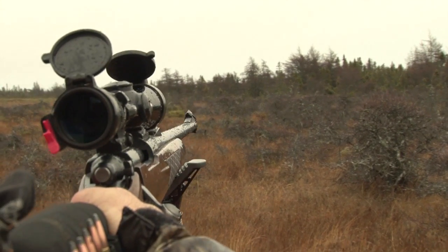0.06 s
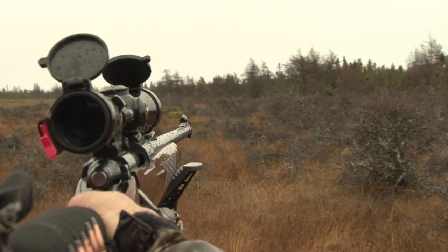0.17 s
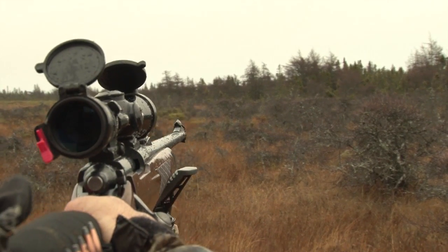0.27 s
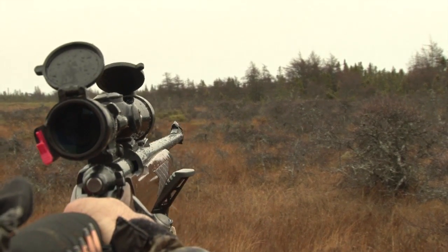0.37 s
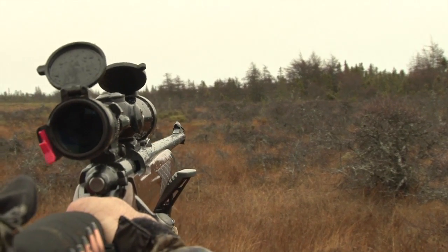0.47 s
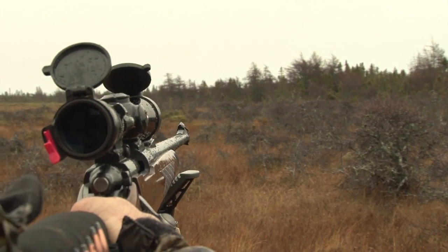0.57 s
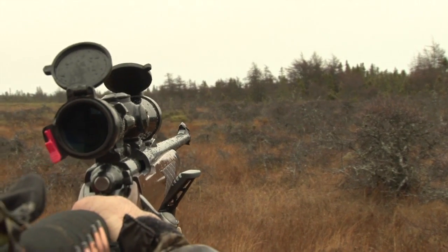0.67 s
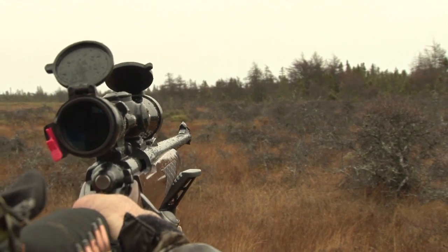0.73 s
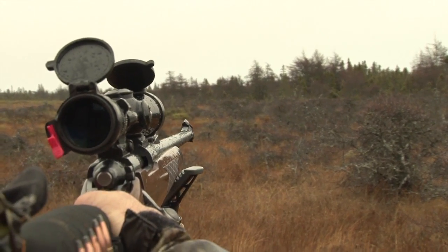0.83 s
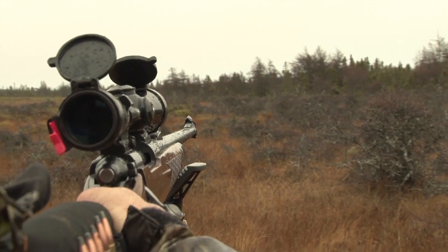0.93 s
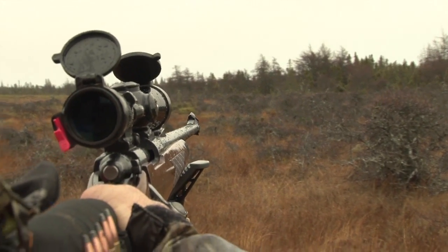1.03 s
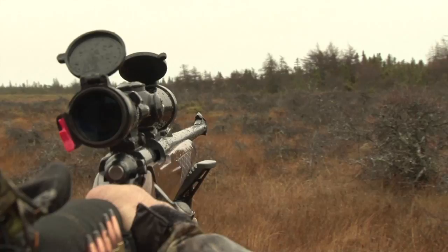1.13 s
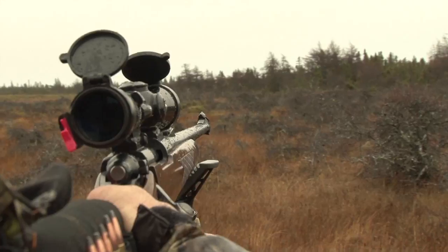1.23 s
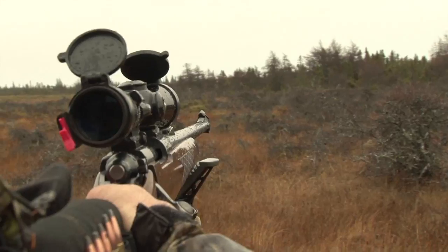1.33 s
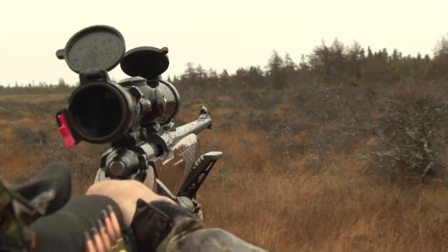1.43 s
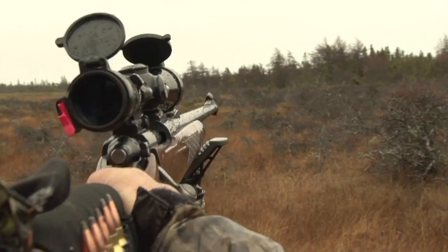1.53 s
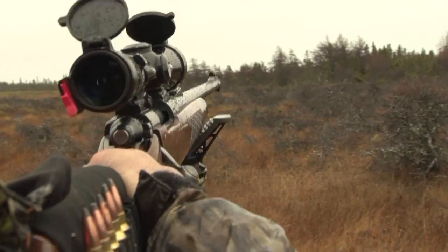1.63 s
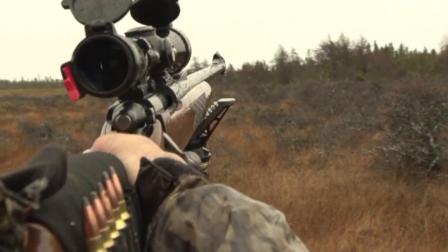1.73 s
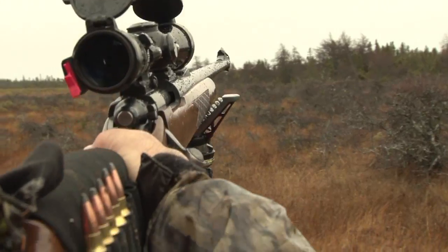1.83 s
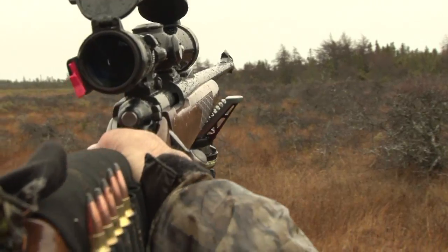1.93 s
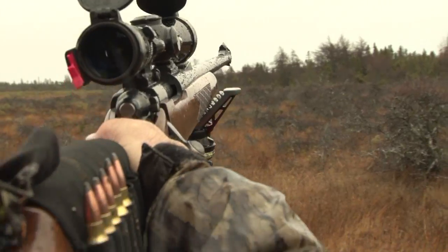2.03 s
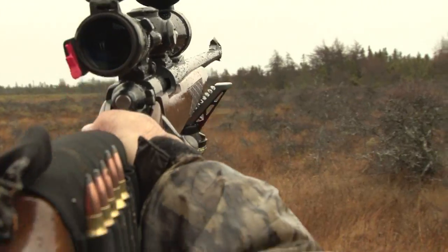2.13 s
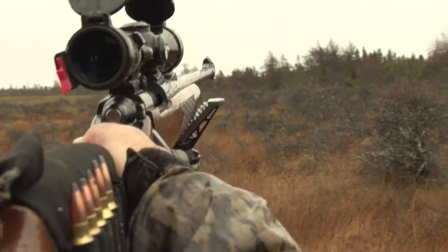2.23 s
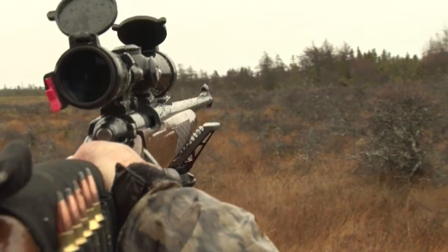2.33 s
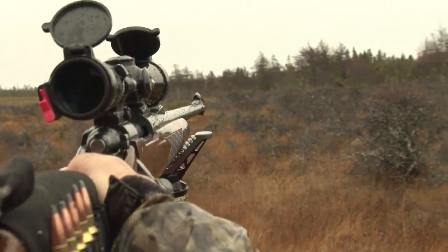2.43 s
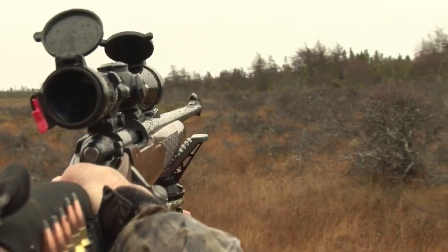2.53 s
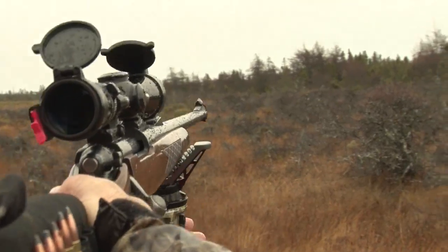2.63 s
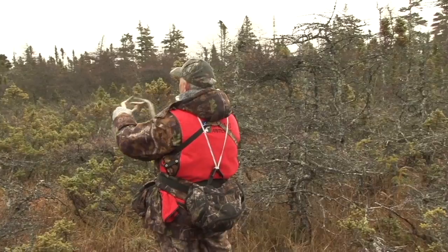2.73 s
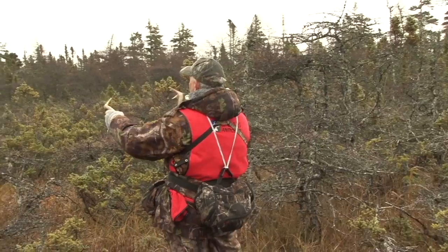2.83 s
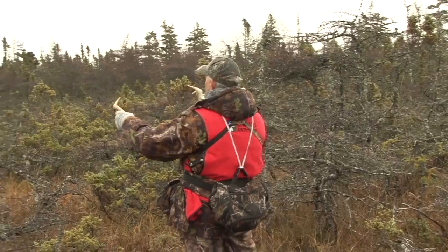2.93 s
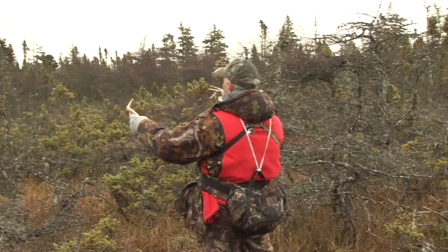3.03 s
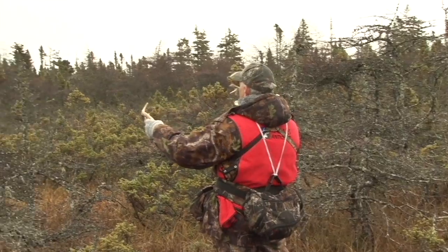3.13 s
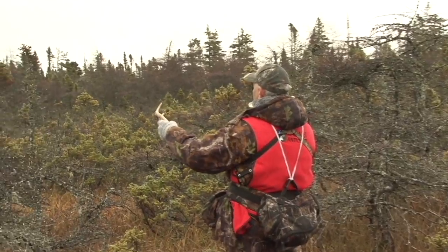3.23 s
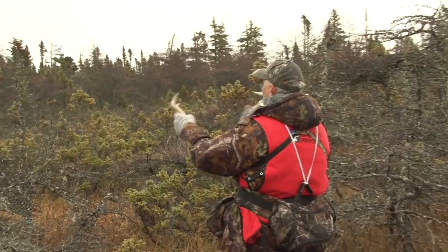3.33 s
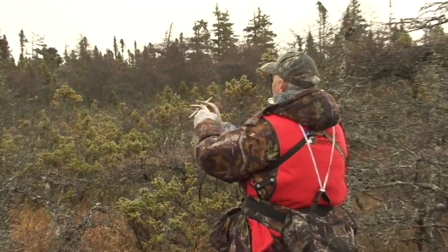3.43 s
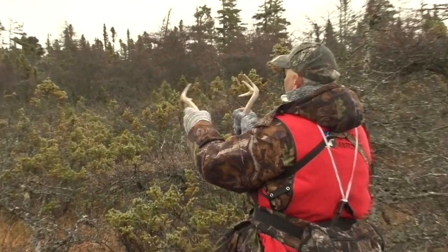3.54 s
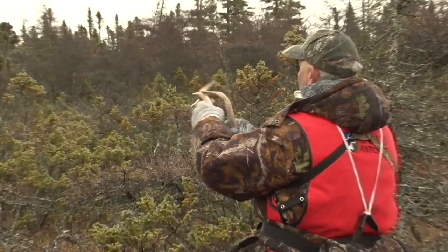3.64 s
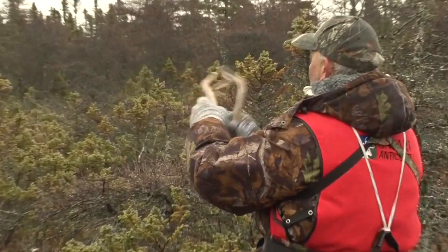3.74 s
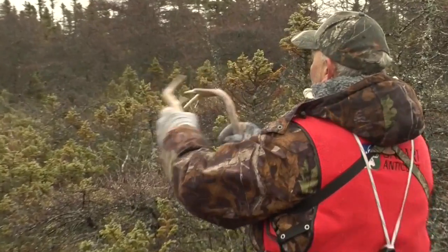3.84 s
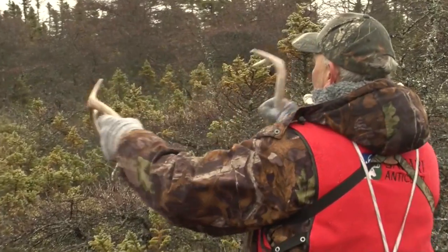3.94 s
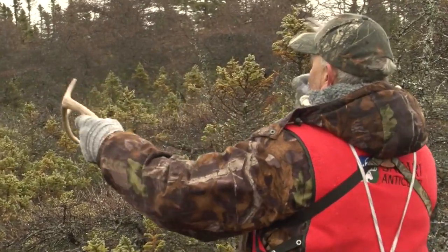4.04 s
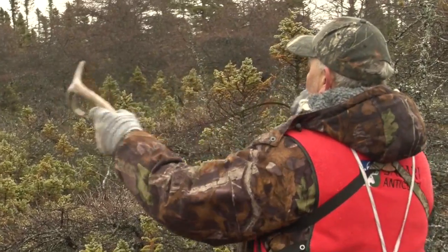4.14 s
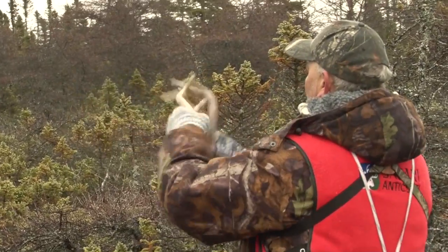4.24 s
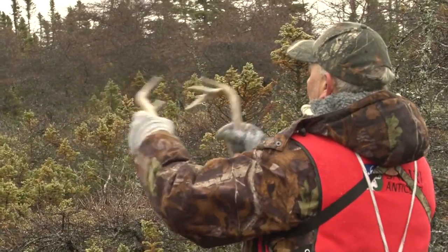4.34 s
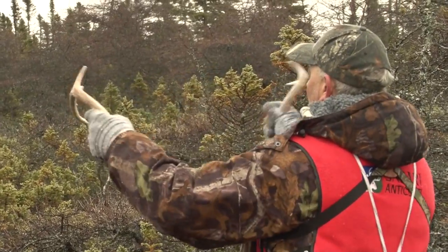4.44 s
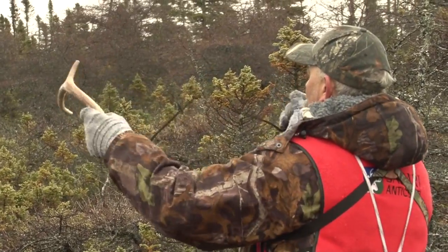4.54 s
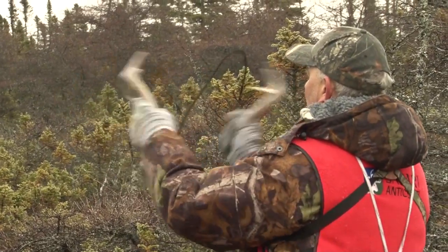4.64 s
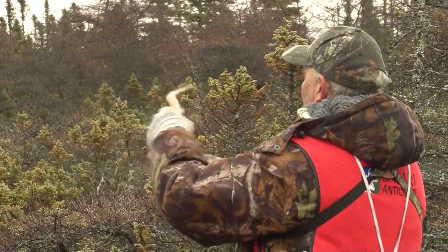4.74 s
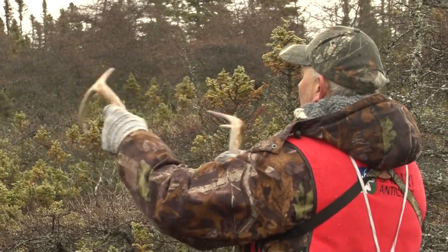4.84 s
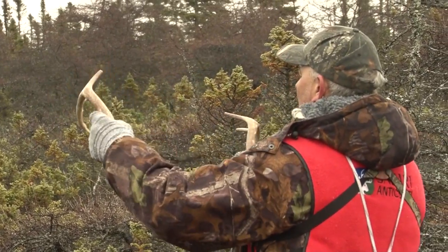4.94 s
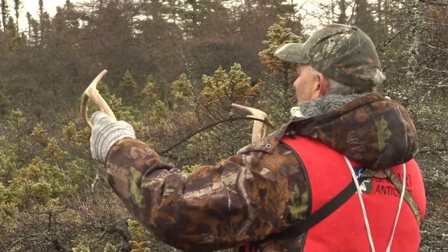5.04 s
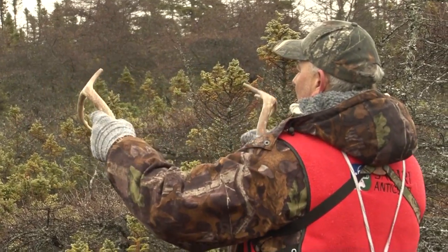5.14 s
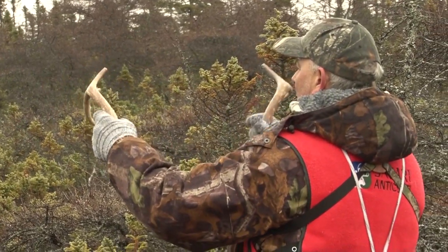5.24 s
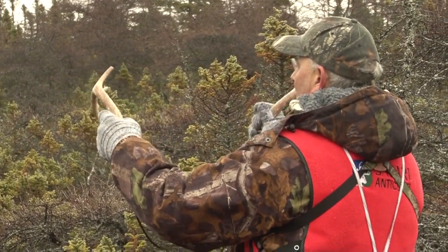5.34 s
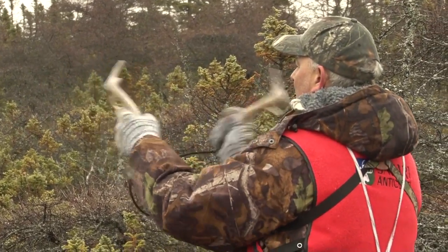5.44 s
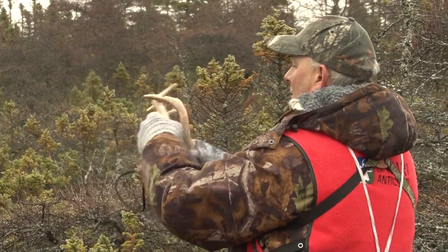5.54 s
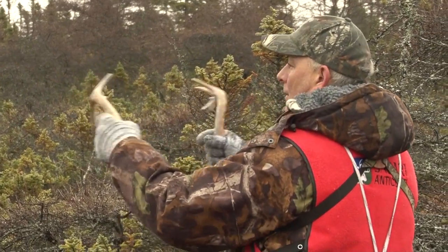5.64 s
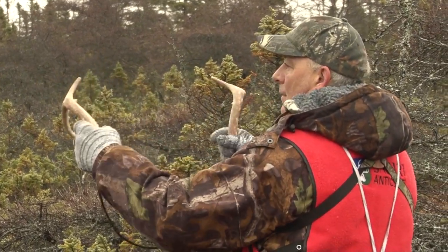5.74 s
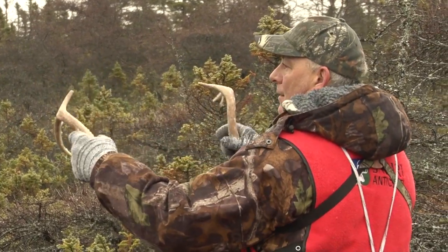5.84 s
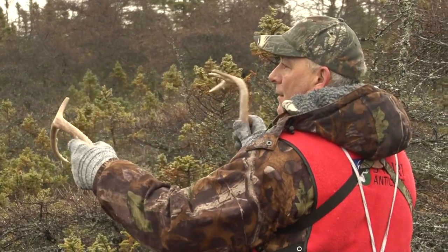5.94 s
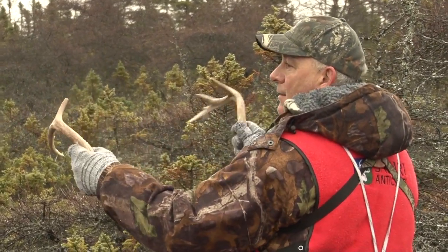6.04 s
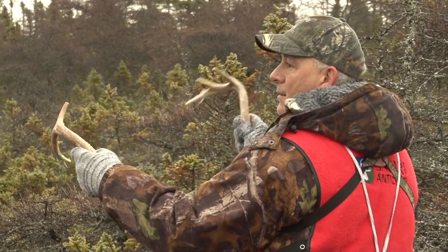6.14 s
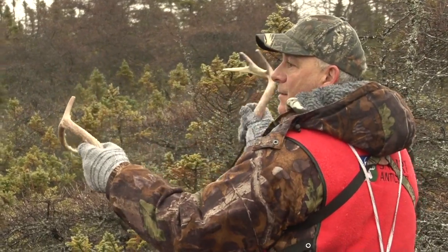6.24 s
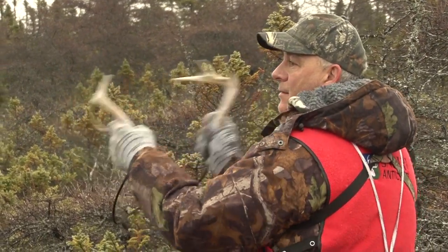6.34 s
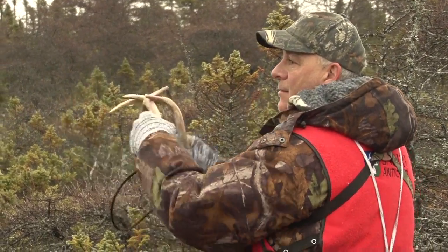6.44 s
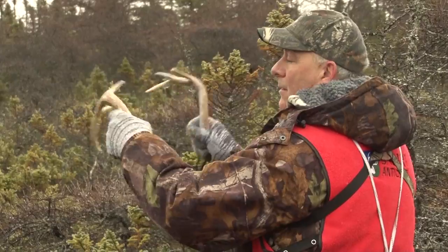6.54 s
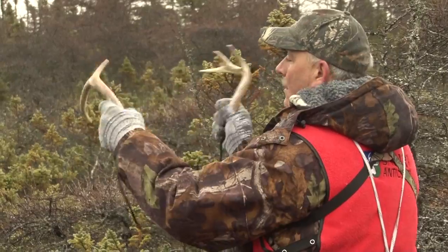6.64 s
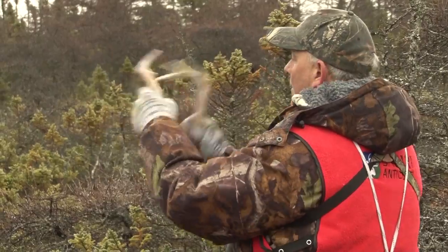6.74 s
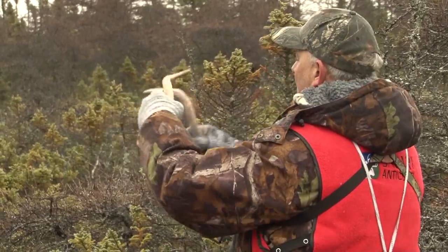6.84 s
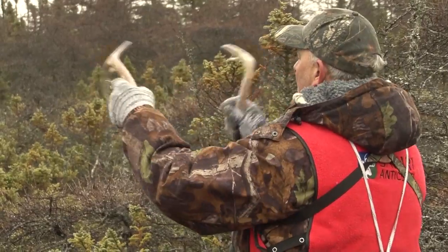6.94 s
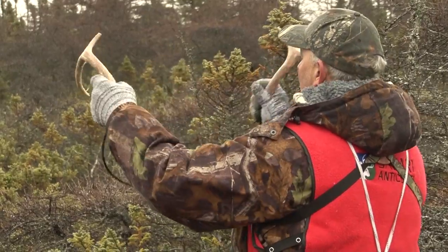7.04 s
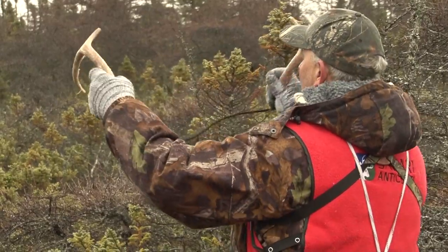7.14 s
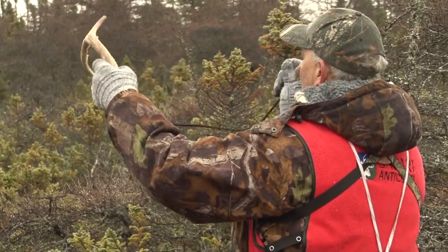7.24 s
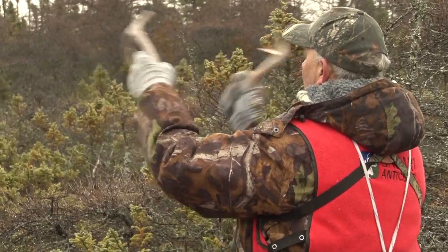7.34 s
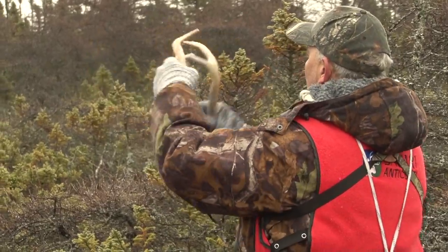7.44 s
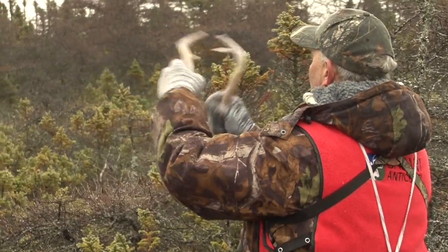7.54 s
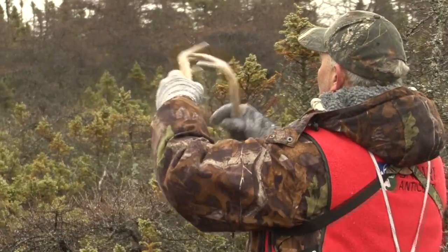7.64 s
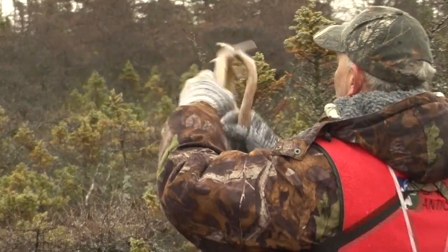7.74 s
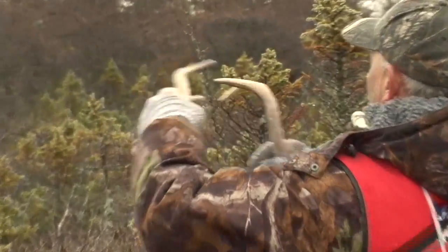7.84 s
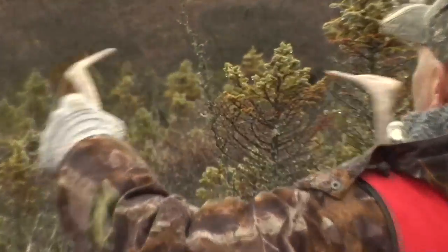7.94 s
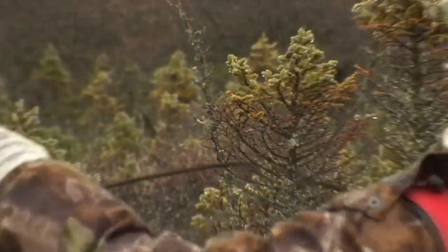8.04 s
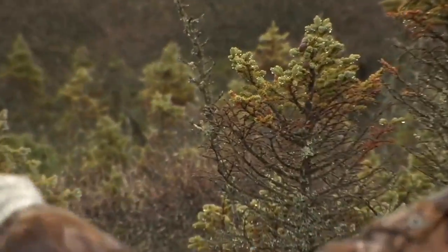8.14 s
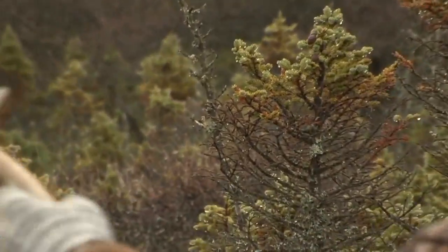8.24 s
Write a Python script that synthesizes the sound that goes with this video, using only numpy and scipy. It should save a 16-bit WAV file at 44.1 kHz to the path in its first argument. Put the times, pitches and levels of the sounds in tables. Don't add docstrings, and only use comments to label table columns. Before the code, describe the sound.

Light rain hisses and taps on a covered microphone in wet scrub, then two antlers clash in sharp, irregular bony clacks and short rattles.

```python
import sys
import numpy as np
from scipy import signal
from scipy.fft import rfft, irfft
from scipy.io import wavfile
from scipy.ndimage import uniform_filter1d

SR = 44100
rng = np.random.default_rng(int(sys.argv[2]) if len(sys.argv) > 2 else 0)


def master(y):
    cut = np.clip(np.atleast_2d(y).T, -1, 1)
    pcm = np.round(cut * 32767)
    wavfile.write(sys.argv[1], SR, pcm.astype(np.int16))


def nominal_scale(level):
    x = np.asarray(level, float) / 20
    return 10 ** x


N = 365456


def colour(x, points):
    hz, db = np.transpose(points)
    f = np.arange(2049) * SR / 4096
    gain_db = np.interp(np.log(f + 1), np.log(hz), db)
    cepstrum = irfft(np.log(nominal_scale(np.clip(gain_db, -70, 30))))
    cepstrum[1:2048] *= 2
    cepstrum[2049:] = 0
    response = irfft(np.exp(rfft(cepstrum)))
    return signal.fftconvolve(x, response)[:len(x)]


def unit(x):
    return x / np.sqrt(np.mean(x ** 2))


def walk(rate):
    hold = int(SR / rate)
    steps = np.repeat(rng.standard_normal(N // hold + 1), hold)
    return uniform_filter1d(uniform_filter1d(steps, hold), hold)[:N]


def add(track, start_s, sound):
    i = int(start_s * SR)
    track[..., i:i + sound.shape[-1]] += sound[..., :N - i]


def curve(table):
    s, db = np.transpose(table)
    return np.interp(np.arange(N) / SR, s, db)


def wash(points, db, side, flicker_db, rate):
    mid, diff = (unit(colour(rng.standard_normal(N), points)) * nominal_scale(flicker_db * walk(rate))
                 for _ in range(2))
    return nominal_scale(db) * np.array([mid + side * diff, mid - side * diff])


def band_noise(count, length, low_hz, high_hz):
    sos = signal.butter(2, [low_hz, high_hz], "band", fs=SR, output="sos")
    return signal.sosfilt(sos, rng.standard_normal((count, length)))


# frequency_hz, density_db
WIND_SPECTRUM = [(12, -34.5), (25, -3), (80, -2.5), (150, -8.5), (250, -34.5), (500, -42)]
# time_s, level_db
BUFFET_LEVELS = [(0, -77), (0.5, -75.5), (1.2, -75), (1.27, -68), (1.45, -71.5), (1.85, -74.5), (2.84, -76),
                 (3.51, -66), (3.92, -73.5), (6.55, -66.5), (7.45, -70.5), (7.68, -66.5), (7.95, -72),
                 (8.29, -64)]


def wind():
    return wash(WIND_SPECTRUM, 4 + curve(BUFFET_LEVELS), side=1.6, flicker_db=2.2, rate=5)


# frequency_hz, density_db
FLUTTER_SPECTRUM = [(100, -22.5), (190, -3.5), (270, 1.5), (330, -3.5), (400, -14.5), (900, -47.5)]
# time_s, level_db
GUST_LEVELS = [(0.0, -65.5), (0.46, -66), (0.81, -66.5), (2.12, -68.5), (2.42, -69.5), (3.32, -61.5),
               (3.9, -68.5), (4.2, -62), (5.08, -65), (5.52, -62.5), (5.7, -56.5), (6.26, -64.5),
               (6.51, -53), (7.04, -61), (7.57, -62), (8.05, -62.5), (8.29, -61.5)]


def flutter():
    calm_db, flutter_db, db_per_gust_db = -64, -68.5, 1.1
    level_db = flutter_db + db_per_gust_db * (curve(GUST_LEVELS) - calm_db)
    return wash(FLUTTER_SPECTRUM, level_db, side=0.38, flicker_db=2.0, rate=11)


# time_s, level_db
RAIN_LEVELS = [
    (0, -62.5),
    (.5, -69),
    (1.25, -65),
    (1.85, -68),
    (3.2, -67),
    (4.2, -64.5),
    (5.3, -71.5),
    (6.3, -71),
    (7.3, -69),
    (8.29, -66.5),
]


def rain_strength():
    return curve(RAIN_LEVELS)


# frequency_hz, density_db
HISS_SPECTRUM = [(2500, -19), (4500, -10), (8000, 0.5), (10200, 5.5), (14800, 0), (15300, -13),
                 (17000, -35)]


def hiss(rain_db):
    t, change_s, open_db, sheltered_db = np.arange(N) / SR, 1.91, -65.5, -74
    level_db = 0.27 * (rain_db + 69) + np.interp(t - change_s, [-.03, .03], [open_db, sheltered_db])
    swell_s, swell_width_s, swell_db = 1.14, 0.22, 4
    level_db = level_db + swell_db * np.exp(-((t - swell_s) / swell_width_s) ** 2)
    noise = wash(HISS_SPECTRUM, level_db, side=.3, flicker_db=1.5, rate=15)
    open_noise = [colour(ear, [(10300, 0.5), (12000, -3)]) for ear in noise]
    return np.where(t < change_s, open_noise, noise)


# frequency_hz, density_db
FAR_SPECTRUM = [(200, -38), (350, 1.5), (660, 2), (1400, -2.5), (2100, -7.5), (4300, -18.5), (7000, -21.5),
                (12000, -46.5)]


def far_patter(rain_db):
    return wash(FAR_SPECTRUM, rain_db, side=.6, flicker_db=3, rate=30)


def tap(t, hz, cycles, sag, rise_s):
    turns = hz * (t - sag * (t - 0.0026 * (1 - np.exp(-t / 0.0018))))
    return np.sin(2 * np.pi * turns) * np.exp(-turns / cycles) * (1 - np.exp(-(t / rise_s) ** 2))


def patter(count=1300):
    out, t, lean = np.zeros((2, N)), np.arange(256) / SR, np.array([[1], [-1]])
    for when, pitch, size, pan in rng.random((count, 4)):
        drop = tap(t, 700 * 7 ** pitch, cycles=1.1, sag=.3, rise_s=.0001)
        level_db = -60.5 - 4 * np.log(size + .03) + 8 * (pan - .5) * lean
        add(out, when * N / SR, drop * nominal_scale(level_db))
    return out


# start_s, level_db, pitch_hz, thump_over_level_db, tick_over_level_db
LEFT_DROPS = [(0.0679, -31, 2220, -12, -4.5), (0.1, -40.5, 1600, 5, -12), (0.2718, -34.5, 4260, -12, -4.5),
              (0.6058, -27.5, 2660, -15.5, -33), (0.7621, -24, 2020, -15.5, -10.5),
              (1.0537, -32.5, 2580, -15, -18), (1.3745, -37, 760, 15, -24), (1.4157, -26, 2540, -16, -30),
              (1.5053, -28, 2500, -2.5, -38), (1.953, -28.5, 2130, -4.5, -22.5),
              (2.2939, -36.5, 2050, -20, -8), (2.5398, -29, 1820, -8, -7.5),
              (2.8282, -28.5, 1800, -6.5, -9), (2.8933, -27, 2030, 1.5, -7), (3.9192, -30, 1640, -4.5, -10),
              (4.5075, -32, 2580, 1, -11.5), (4.5578, -16, 1840, -5, -12.5), (4.8638, -31.5, 1620, -12, 0),
              (5.463, -20.5, 2070, -6, -17), (5.9721, -33, 2620, -12.5, -28),
              (6.1685, -34.5, 2600, 3.5, -5.5), (6.4203, -31.5, 2750, -6, -22),
              (6.5454, -30, 2570, -19, -14), (7.602, -27.5, 1780, -15, -17)]
# start_s, level_db, pitch_hz, thump_over_level_db, tick_over_level_db
RIGHT_DROPS = [(0.8574, -33.5, 1590, -4, -35), (0.8745, -32, 1670, -3.5, -12.5),
               (1.129, -37.5, 2000, -20, -11.5), (1.786, -38.5, 2040, -7.5, -5.5),
               (2.0401, -38, 1770, 0, -11), (2.4865, -34.5, 2350, -18, -18),
               (2.6497, -35.5, 1530, -2.5, -16), (2.7046, -33.5, 2000, -0.5, -11),
               (2.9577, -33, 2130, 1, -10), (3.1504, -36.5, 2620, 0.5, -10), (3.1773, -42, 1230, 9, -13),
               (3.2987, -33.5, 2040, -10.5, -19), (4.1202, -36, 1580, 5.5, -7.5),
               (4.132, -39.5, 1700, -2.5, -5), (4.6217, -38.5, 2320, -1, -8.5),
               (5.0138, -36, 1960, -12, -7.5), (5.2664, -34, 1560, -9.5, -30),
               (5.8724, -37.5, 1606, -0.5, -3.5), (6.2135, -37, 1590, -14.5, -13),
               (6.2336, -38.5, 1600, -5.5, -12), (6.3326, -31.5, 1710, -0.5, -12),
               (7.0872, -34.5, 2530, -5, -12.5), (7.2853, -32, 2610, -0.5, -15.5),
               (7.8322, -20, 2320, -2, -7.5)]
# start_s, level_db, pitch_hz, tick_over_level_db
EARLY_DRIPS = [(0.147, -41.5, 1400, -4), (0.2319, -46, 1640, -4), (0.2607, -52, 2590, -13),
               (0.292, -42.5, 1290, -13), (0.3136, -48, 1510, -25), (0.388, -39.5, 1550, -28),
               (0.4173, -36, 1610, -15), (0.451, -40.5, 1670, -31), (0.4581, -39.5, 2220, -9),
               (0.496, -50, 1620, -18), (0.5342, -38.5, 1490, -16), (0.565, -40, 1500, -29),
               (0.618, -31, 1490, -32), (0.6987, -49, 890, -14), (0.7264, -52.5, 1130, -11),
               (0.78, -39, 1400, -13), (0.7957, -36, 2320, -20), (0.8367, -41, 1290, -15.5),
               (0.8871, -44, 1270, -32), (0.91, -41, 2390, -0.5), (0.9143, -42.5, 2280, -13),
               (0.926, -38.5, 1820, -20), (0.943, -44, 1590, -24), (1.0303, -35, 1400, -11),
               (1.0473, -35, 1720, -18), (1.0644, -40.5, 1280, -5), (1.126, -40, 2200, -19),
               (1.147, -42, 660, -16), (1.177, -41, 660, -16), (1.301, -47, 1390, -25),
               (1.3228, -50.5, 2490, -16), (1.3405, -44.5, 2210, -10), (1.446, -39.5, 570, -8),
               (1.4969, -43, 1500, -13), (1.5096, -31.5, 1200, -10), (1.5985, -40, 2240, -15.5),
               (1.6356, -36, 1580, -18), (1.7631, -47, 2380, -25), (1.8228, -48.5, 1850, -14),
               (1.8439, -40, 1610, -12), (1.858, -34, 2240, -23), (1.9257, -34, 1300, -34),
               (2.0542, -32.5, 1500, -14)]
# start_s, level_db, pitch_hz, tick_over_level_db
MIDDLE_DRIPS = [(2.098, -34.5, 2660, -6.5), (2.2211, -35, 1470, -22), (2.418, -53, 1290, -4),
                (2.5638, -43, 1100, -21), (2.621, -47.5, 1400, -10), (2.6754, -47, 1870, -11),
                (2.68, -46, 1260, -14), (2.862, -39, 1210, -22), (3.045, -36.5, 2350, -23),
                (3.0562, -42.5, 1550, -20), (3.08, -45.5, 1620, -7), (3.2006, -42, 1760, -18),
                (3.2483, -48, 1440, -15), (3.2783, -43, 1430, -19), (3.2926, -36, 1470, -21.5),
                (3.3414, -41.5, 1310, -11), (3.3716, -38.5, 1510, -22), (3.662, -43, 2210, -15),
                (3.6814, -35.5, 1400, -22), (3.7846, -32, 1970, -27), (3.788, -33.5, 1490, -13),
                (3.824, -40, 1650, -9), (4.161, -37, 2430, -20), (4.216, -45.5, 2020, -24),
                (4.5894, -37, 1300, -15), (4.5933, -41.5, 900, -35), (4.633, -36, 2510, -8),
                (4.6805, -41, 1760, -11), (4.685, -41, 940, -27), (4.7443, -42, 1660, -33),
                (4.949, -31.5, 1490, -21), (5.006, -36, 1390, -15), (5.0703, -37, 2020, -18.5),
                (5.0963, -43.5, 1380, -28.5), (5.167, -49.5, 840, -22), (5.22, -45.5, 2100, -6.5),
                (5.2354, -38, 1450, -22), (5.263, -45, 940, -22), (5.321, -52.5, 2170, -10),
                (5.406, -45, 2190, -5), (5.429, -42.5, 1320, -30), (5.4948, -47, 1490, -21),
                (5.5168, -44, 1900, -27), (5.56, -35, 1420, -14)]
# start_s, level_db, pitch_hz, tick_over_level_db
LATE_DRIPS = [(5.677, -38, 600, -22), (5.7345, -38.5, 1360, -19), (5.7895, -39, 1580, -6.5),
              (5.924, -43.5, 1720, -21), (5.9806, -41, 1850, -7), (6.0265, -43, 1510, -8),
              (6.0934, -43, 2100, -21), (6.1278, -50.5, 1640, -16), (6.16, -44, 1660, -7),
              (6.195, -46, 2420, -11), (6.206, -37.5, 2110, -14), (6.2441, -45, 2120, -20),
              (6.251, -36, 1740, -23), (6.3422, -33, 1840, -18), (6.4054, -44, 1410, -11),
              (6.7551, -44.5, 1480, -12), (6.7706, -44.5, 1110, -30), (6.8006, -43, 920, -19),
              (6.807, -44, 2000, -22), (7.018, -45.5, 890, -16), (7.025, -42, 2150, -11),
              (7.1145, -45, 1740, -21), (7.1192, -49, 2190, -18), (7.1456, -43, 1820, -17),
              (7.1491, -38.5, 1630, -8), (7.196, -48, 1335, -22.5), (7.324, -43.5, 2380, -16),
              (7.369, -41, 2520, -13), (7.395, -48, 1680, -9), (7.4535, -38, 2060, -23),
              (7.547, -33, 1310, -16), (7.6283, -43, 2080, -4), (7.995, -40, 750, -16.5),
              (8.035, -43.5, 1530, -15), (8.0846, -41.5, 1490, -14), (8.093, -43, 1710, -29),
              (8.132, -44, 1640, -14), (8.2092, -42.5, 1200, -22), (8.242, -40, 1460, -19),
              (8.254, -44, 1820, -16)]


def drops():
    rows, drip_db, drip_thump_db, pan_scatter_db = [], -2.5, -9, 4.5
    for table, pan_db in ((LEFT_DROPS, 5), (RIGHT_DROPS, -8.5)):
        for row, r in zip(table, rng.random(len(table)) - .5):
            rows.append((*row, pan_db + pan_scatter_db * r))
    for table in (EARLY_DRIPS, MIDDLE_DRIPS, LATE_DRIPS):
        for (s, db, hz, tick_db), r in zip(table, rng.random(len(table)) - .5):
            rows.append((s, db + drip_db, 1.116 * hz, drip_thump_db, tick_db, 12 * r))
    return rows


def rain_near():
    out, t, lean = np.zeros((2, N)), np.arange(1024) / SR, np.array([[1], [-1]])
    dull_hz = 930
    rows = drops()
    luck = rng.random((len(rows), 3))
    grit = band_noise(len(rows), len(t), 3500, 12000)
    for (s, db, hz, thump_db, tick_db, pan_db), noise, r in zip(rows, grit, luck):
        tick = nominal_scale(tick_db + 8.5) * noise * np.exp(-t / 0.00044)
        drop = tap(t, hz, cycles=1.66, sag=0.55, rise_s=0.3 / hz) + tick
        if hz < dull_hz:
            drop = 0.78 * np.sin(2 * np.pi * hz * t) * np.exp(-t / 0.0038) * (1 - np.exp(-(t / 0.0017) ** 2))
        cavity = np.sin(2 * np.pi * (3800 + 500 * r[1]) * t) * np.exp(-t / 0.0006)
        drop = drop + nominal_scale(-13 - 10 * r[2]) * cavity
        drop = drop + (.15 + .3 * r[0]) * np.roll(drop, int(SR * (.0006 + .0004 * r[1])))
        thump = tap(t, 800 + 300 * r[2], cycles=0.9, sag=0.809, rise_s=0.00041)
        thump = (hz > dull_hz) * nominal_scale(thump_db + 3) * thump
        cover = nominal_scale(thump_db - 13) * tap(t, 409, cycles=1.8, sag=0.27, rise_s=0.0019)
        both = (drop + thump) * nominal_scale(lean * pan_db / 2) + cover * (.25 - 0.78 * lean)
        add(out, s, nominal_scale(db + 3.5) * both)
    return out


def sleeve():
    start_s, length_s, from_hz, to_hz, level_db = 8.135, 0.048, 3900, 3100, -62
    out, u = np.zeros(N), np.arange(int(length_s * SR)) / (length_s * SR)
    wobble = uniform_filter1d(rng.standard_normal(len(u)), size=60) * 8
    turns = np.cumsum(from_hz + (to_hz - from_hz) * u) / SR
    tone = np.sin(2 * np.pi * turns) + 0.43 * np.sin(2 * np.pi * 4500 * u * length_s)
    add(out, start_s, nominal_scale(level_db) * np.sin(np.pi * u) * wobble * tone)
    return out


# start_s, body_db, then beam_over_body_db, tines_over_body_db, crack_over_body_db
BLOWS = [(2.1437, -11, -14, -13, -11), (2.148, -22, -2.5, 3.5, 2), (2.1766, -25, -13, -27.5, -13.5),
         (2.7414, -11, -11.5, -5, -6), (2.747, -17, -8, -22, -27), (2.7664, -22.5, -41, -8, -8.5),
         (3.493, -13.5, -4.5, -9, -11), (3.4955, -12, -8.5, 2, -14.5), (3.6906, -18, -13.5, -2.5, -10),
         (3.719, -20, -12, -6.5, -16), (3.8601, -16, -14, 3.5, -9.5), (4.3341, -10.5, -13, 2.5, -5),
         (4.7769, -12.5, -7.5, -5, -6), (5.5909, -10.5, -11, -4.5, -10.5), (6.4773, -21, -18, 1, -8),
         (6.4799, -18, -2.5, 2.5, -7.5), (6.4981, -20, -15, -2.5, -9.5), (6.8585, -24, 2.5, -15, -6),
         (6.8607, -24.5, -5.5, -9, -16), (6.9322, -24.5, -3, -8, -16), (7.4773, -16.5, -3.5, -11, -14.5),
         (7.4817, -14.5, -9.5, -11, -36), (7.6688, -11.5, -11.5, -3.5, -12.5),
         (7.8459, -22.5, -6.5, 4.5, -2.5)]
# start_s, body_db, tines_over_body_db (higher nearer the tips)
TOUCHES = [(2.1403, -29, 15.5), (2.1697, -27.5, -2), (2.777, -30, -5), (3.489, -27.5, 12.5),
           (3.508, -25, -4), (3.517, -31, -15.5), (3.567, -37, 0), (3.696, -25, -1), (3.7395, -32, -8),
           (3.755, -36, 5), (3.8423, -45, 10), (3.8453, -31.5, 3.5), (3.855, -30, 6), (3.8654, -22, -3.5),
           (5.584, -27, -7), (4.3598, -23.5, -3.5), (4.7734, -19.5, 3.5), (4.7993, -37, 11),
           (5.619, -32, -9), (5.6313, -28, -11), (6.8552, -26.5, 5.5), (6.8826, -27.5, 7.5),
           (6.9396, -27, -4.5), (7.4905, -27, 8), (7.5034, -33.5, -8), (7.514, -31, -0.5),
           (7.648, -40.5, -2), (7.661, -31, 1), (7.6786, -28.5, -5), (7.851, -23, -3), (3.579, -39, 3),
           (3.7293, -37, -1), (4.3326, -27.5, -7), (6.8708, -33, 2), (6.9292, -37, -3), (4.835, -46.5, 8)]


def contacts():
    beam_db, crack_over_tines_db = -7, -10
    return list(BLOWS) + [(s, db, beam_db, tip_db, tip_db + crack_over_tines_db) for s, db, tip_db in TOUCHES]


# t60_s, level_db, low_edge_hz, high_edge_hz
SCATTERERS = [
    (1, -6.5, 1100, 1410),
    (0.44, -1.5, 1800, 2370),
    (0.32, 1, 3100, 11000),
    (0.11, 1, 1020, 1510),
    (0.64, -9.5, 2000, 7600),
]
# frequency_hz, width_hz, level_db
ECHO_RINGS = [(1500, 140, 1.5), (2130, 130, 4), (2500, 120, 3.5), (2970, 180, 1), (4194, 760, -3),
              (6740, 680, -2)]


def bushes():
    s, body_db, _, tine_db, crack_db = np.transpose(contacts())
    body, tines, crack = nominal_scale(body_db), nominal_scale(body_db + tine_db), nominal_scale(body_db + crack_db)
    strengths = (body, tines, crack, np.hypot(body, tines), crack)
    t, out = np.arange(SR) / SR, 0
    for (t60, db, low_hz, high_hz), strength in zip(SCATTERERS, strengths):
        fronts = np.zeros(N)
        fronts[(s * SR).astype(int)] = strength ** 2
        fade = (np.exp(-np.log(1000) * t / t60) * (1 - np.exp(-(t / .01) ** 2))) ** 2
        power = np.clip(signal.fftconvolve(fronts, fade / fade.sum())[:N], 0, None)
        mid, side = rng.standard_normal((2, N)) * nominal_scale(4.5 * walk(120))
        sos = signal.butter(1, [low_hz, high_hz], "band", fs=SR, output="sos")
        echo = signal.sosfilt(sos, np.array([mid + 0.58 * side, mid - 0.38 * side]))
        echo = echo + sum(nominal_scale(lift_db) * signal.lfilter(*signal.iirpeak(hz, hz / width, fs=SR), echo)
                          for hz, width, lift_db in ECHO_RINGS)
        out = out + nominal_scale(db) * np.sqrt(power) * unit(echo)
    return out


def ring(modes, t, chance, rise_s, scatter_db, detune):
    hz, db, t60 = np.transpose(modes)[:, :, None]
    size, shift, sign = chance[:, :len(modes), None]
    fade = np.exp(-np.log(1000) * t / t60) * (0.71 + 0.35 * np.exp(-(t / 0.019) ** 2))
    wave = np.sin(2 * np.pi * hz * (1 + detune * shift) * t) * fade
    gain = nominal_scale(db + scatter_db * size) * np.sign(sign)
    return (gain * wave).sum(0) / np.sqrt(np.sum(gain ** 2)) * (1 - np.exp(-t / rise_s))


# frequency_hz, level_db, t60_s
BEAM_MODES = [
    (265, -16.5, 0.056),
    (754, 0.5, 0.028),
]
# frequency_hz, level_db, t60_s
BODY_MODES = [(1090, -3.5, 0.013), (1300, -6, 0.0062), (1640, -7.5, 0.0041), (1820, -6.5, 0.016)]
# frequency_hz, level_db, t60_s
TINE_MODES = [(2080, -1.5, 0.019), (2495, -1.5, 0.017), (2797, -5.5, 0.023), (3096, 0, 0.014),
              (3800, -12, 0.01)]
# frequency_hz, level_db, t60_s
TIP_MODES = [(4320, -1.5, 0.011), (5330, 0, 0.013), (6810, 0.5, .012), (9630, 4.5, 0.012)]
# low_beam_hz, high_beam_hz, low_over_high_db, main_body_hz
GRIPS = [(760, 470, 8.5, 1465), (570, 890, -10.5, 1500), (750, 980, 1, 1480), (572, 1020, -11, 1520),
         (630, 1500, -19, 1500), (530, 780, -5, 1550), (600, 1060, -13, 1600), (571, 890, -4.5, 1447),
         (553, 1010, -4, 1380), (750, 1120, 7, 1470), (537, 810, -27.5, 1410), (572, 870, 0.5, 1510),
         (590, 900, -6.5, 1490), (560, 866, -5, 1444), (574, 910, 2, 1500), (578, 936, -3, 1484),
         (685, 930, 4, 1500), (600, 950, 15, 1780), (625, 775, 8, 980), (600, 910, 7, 1700),
         (587, 1130, -4.5, 1700), (610, 865, -11, 1430), (574, 910, -3.5, 1460), (580, 730, 3, 1730)]
# low_beam_hz, high_beam_hz, low_over_high_db, main_body_hz
LOOSE_GRIP = (572, 925, -6.5, 1480)


def antlers():
    out, t = np.zeros(N), np.arange(4096) / SR
    rows = contacts()
    chance = rng.standard_normal((len(rows), 5, 3, 6))
    grit = band_noise(len(rows), len(t), 4000, 13000)
    for k, ((s, db, beam_db, tine_db, crack_db), c, noise) in enumerate(zip(rows, chance, grit)):
        gripped = k < len(GRIPS)
        low_hz, high_hz, low_db, main_hz = GRIPS[k] if gripped else LOOSE_GRIP
        loose = 0 if gripped else .04
        body = ring([(main_hz, 0, 0.029)], t, c[3], rise_s=.0004, scatter_db=0, detune=loose)
        body = body + ring(BODY_MODES, t, c[0], rise_s=0.00064, scatter_db=0.5, detune=0.052)
        held_modes = [(low_hz, low_db, 0.03), (high_hz, 0, 0.034)]
        beam = ring(held_modes, t, c[4], rise_s=.0025, scatter_db=0, detune=loose)
        beam = beam + nominal_scale(-8) * ring(BEAM_MODES, t, c[1], rise_s=0.0035, scatter_db=-3, detune=0.056)
        tines = ring(TINE_MODES, t, c[2], rise_s=0.00055, scatter_db=1.5, detune=0.01)
        crack = noise * (1.6 * np.exp(-t / 0.00034) + 0.65 * np.exp(-t / 0.0026) + 0.13 * np.exp(-t / 0.023))
        tips = ring(TIP_MODES, t, c[3][:, 1:], rise_s=0.0006, scatter_db=4, detune=0.026)
        crack = nominal_scale(-4) * crack + nominal_scale(-1) * tips
        clack = body + nominal_scale(beam_db + 5.5) * beam + nominal_scale(tine_db - 1.25) * tines + nominal_scale(crack_db + 6.5) * crack
        add(out, s, nominal_scale(db + 0.7) * clack)
    return out


# frequency_hz, side_over_middle_db
PORT_DIFFERENCE = [(500, -5.5), (1500, -12), (3200, -15), (4800, -9), (6000, -19.5), (12000, -15.5)]


def at_ports(bone):
    side = colour(bone - 1.28 * np.roll(bone, 3), PORT_DIFFERENCE)
    return np.array([bone + side, bone - side])


def scene():
    rain_db = rain_strength()
    background = wind() + flutter() + hiss(rain_db) + far_patter(rain_db) + patter()
    return background + rain_near() + sleeve() + bushes() + at_ports(antlers())


# frequency_hz, gain_db
HOUSING_RESPONSE = [(3000, 1.5), (4400, 0), (5100, -8), (6100, -5.5), (6850, -4), (8600, -14.5),
                    (9900, -15.5), (11300, -19.5), (14500, -18.5), (16500, -22), (17200, -71.5)]


def housing(dry):
    mid, side = (dry[0] + dry[1]) / 2, (dry[0] - dry[1]) / 2
    mid = colour(mid, HOUSING_RESPONSE)
    side = colour(side, [(5200, 0), (8000, -19.5), (16500, -11.5)])
    return np.array([mid + side, mid - side])


def top_cut(x):
    return signal.sosfilt(signal.butter(12, 16880, fs=SR, output="sos"), x)


def record(dry):
    mix = housing(dry)
    return top_cut(mix)


dry = scene()
out = record(dry)
master(out)
```